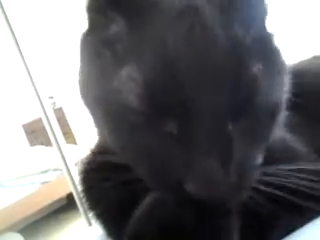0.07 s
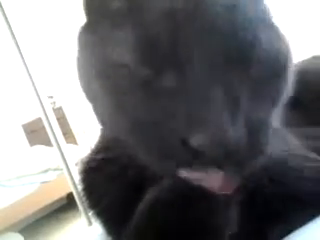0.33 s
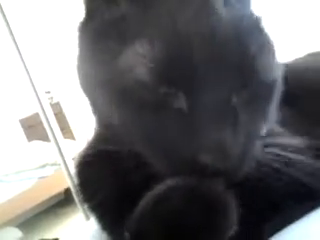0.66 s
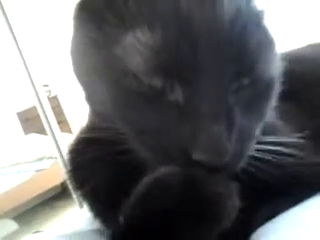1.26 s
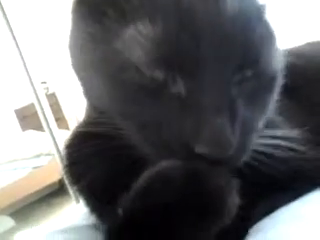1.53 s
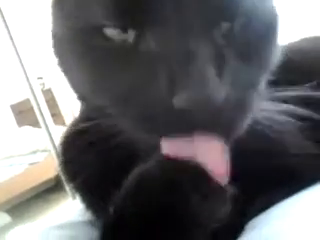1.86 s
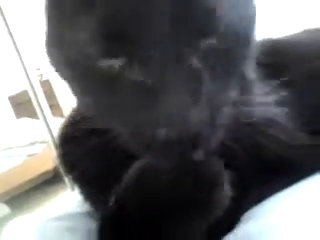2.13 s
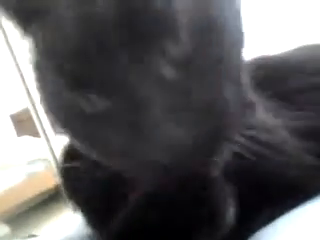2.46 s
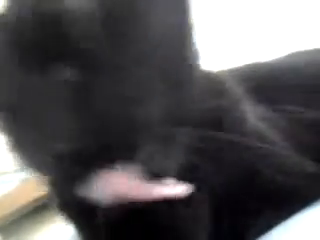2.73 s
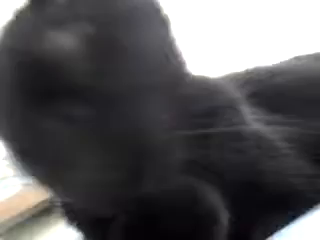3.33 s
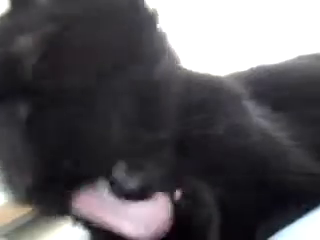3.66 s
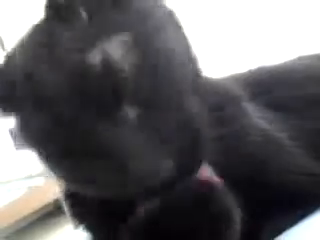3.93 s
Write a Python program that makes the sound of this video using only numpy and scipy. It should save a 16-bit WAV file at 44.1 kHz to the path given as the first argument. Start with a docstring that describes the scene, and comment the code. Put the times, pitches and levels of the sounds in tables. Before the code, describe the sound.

A cat licks its paw with faint wet ticks, and one sharp bump clicks midway.

```python
"""A cat licks its paw close to a small microphone, over room rumble, a faint wavering hum and hiss.
First the rough tongue brushes the fur twice. Then saliva films snap in wet ticks, and the parting
tongue and lips make soft, dull pops. Halfway through, amid the busiest licking, a bump gives one
sharp, rasping click with a low thud. The hum swells briefly, and the licking thins to a few ticks."""
import sys
import numpy as np
from scipy import signal
from scipy.fft import rfft, irfft, next_fast_len
from scipy.io import wavfile
from scipy.ndimage import map_coordinates

SR = 44100
rng = np.random.default_rng(int(sys.argv[2]) if len(sys.argv) > 2 else 0)


def generate_wav(sig):
    """Save sig (samples, or channels by samples) to the path in sys.argv[1] as 16-bit PCM at SR."""
    pcm = np.round(np.clip(np.atleast_2d(sig).T, -1, 1) * 32767).astype(np.int16)
    wavfile.write(sys.argv[1], SR, pcm)


N = 176400


def amp(db):
    """Decibels to gain."""
    return 10 ** (np.asarray(db) / 20)


def unit(x):
    """Scale to rms 1."""
    return x / np.sqrt(np.mean(x ** 2) + 1e-20)


def add(track, s, sound):
    """Mix a sound in at s seconds."""
    i = int(round(s * SR))
    track[i:i + len(sound)] += sound[:N - i]


def curves(rows):
    """Automation lanes: one value per sample for each column after the time."""
    times, *columns = np.transpose(rows)
    return [np.interp(np.arange(N) / SR, times, column) for column in columns]


def wobble(rate):
    """A smooth random curve, rate knots a second."""
    return map_coordinates(rng.standard_normal(400), [np.arange(N) * rate / SR], mode="mirror")


def coloured(x, points):
    """EQ x through (frequency [Hz], gain [dB]) points on a log frequency axis."""
    point_hz, db = np.transpose(points)
    hz = np.fft.rfftfreq(len(x), 1 / SR)
    gain = amp(np.interp(np.log(hz + 1), np.log(point_hz + 1), db))
    return irfft(rfft(x) * gain, len(x))


def noise(points):
    """Coloured noise of rms 1."""
    return unit(coloured(rng.standard_normal(N), points))


def decay(t, t60):
    """Falls 60 dB in t60 seconds."""
    return np.exp(-np.log(1000) * t / t60)


# Cues for the snapping saliva films:
# (time [s], ring level [dB], pitch [Hz], ring decay t60 [s], snap level [dB])
TICKS = [(.154, -59, 2750, .012, -64), (0.3988, -48, 2480, 0.009, -49.5), (0.5436, -55, 2600, .01, -60),
         (0.565, -48, 2750, .009, -46.5), (.5658, -50, 3600, .008, -57), (.6727, -54, 3300, .006, -47.5),
         (.936, -54, 3450, .01, -57), (1.483, -55, 1890, .01, -60), (1.9505, -41.5, 1700, 0.0053, -48),
         (1.9558, -45, 1550, .008, -54), (2.008, -48.5, 2600, 0.016, -46.5),
         (2.0728, -61, 2700, 0.009, -54), (2.0858, -43.5, 3070, 0.0064, -41),
         (2.086, -44.5, 4400, 0.0067, -55), (2.148, -54, 2680, .008, -61), (2.376, -56, 3260, .012, -49),
         (2.4951, -46, 2550, 0.01, -49), (2.497, -55, 4230, .008, -49), (3.069, -39.5, 2645, .0115, -55),
         (3.338, -46.5, 2790, 0.012, -54), (3.512, -54, 2600, .01, -62), (3.647, -54.5, 2900, .014, -62),
         (3.834, -56, 3450, 0.0091, -59), (3.980, -51.5, 2450, 0.012, -58)]


def tongue_ticks(attack_s=0.00037, snap_t60_s=0.0062, snap_band_hz=(1300, 4870)):
    """Each wet snap crackles and rings a tiny pocket of air for a few milliseconds."""
    out, t = np.zeros(N), np.arange(SR // 20) / SR
    band = signal.butter(3, snap_band_hz, "band", fs=SR, output="sos")
    attack = 1 - np.exp(-t / attack_s)
    for s, ring_db, hz, t60, snap_db in TICKS:
        ring = np.sqrt(2) * np.sin(2 * np.pi * hz * t) * decay(t, t60) * attack
        snap = signal.sosfilt(band, rng.standard_normal(len(t)) * decay(t, snap_t60_s))
        add(out, s, amp(ring_db) * ring + amp(snap_db) * snap / abs(snap).max())
    return out


# Cues for tongue and lips parting:
# (time [s], peak before the cavity resonance [dB], start pitch [Hz], end pitch [Hz], attack [s])
POPS = [(.5651, -42, 1750, 550, .001), (0.6727, -45, 1150, 620, 0.0011), (0.6942, -40.5, 806, 160, .0011),
        (1.0244, -42.5, 866, 200, 0.0012), (1.4996, -39, 920, 190, 0.0013),
        (1.5687, -53, 850, 220, 0.00089), (1.6981, -39, 810, 190, 0.0016),
        (1.9552, -34.5, 890, 190, 0.0013), (2.0068, -49, 2100, 520, .0009),
        (2.071, -42.5, 1230, 170, 0.0017), (2.0858, -42.5, 600, 150, 0.0019),
        (2.1301, -47, 835, 220, 0.0016), (2.1477, -47.5, 1600, 430, .0011),
        (2.1921, -45.5, 990, 149, .0019), (2.274, -52, 755, 200, .0012), (2.4949, -39, 330, 161, 0.0021),
        (2.4982, -45.5, 1000, 350, 0.00077), (3.3372, -50, 1900, 1200, .0008)]


def mouth_pops(glide_s=0.0015, cavity_hz=690, cavity_db=-6):
    """A release of suction rings the mouth for a few cycles; the pitch dives as the gap opens."""
    pops, t = np.zeros(N), np.arange(SR // 20) / SR
    for s, db, start_hz, end_hz, attack_s in POPS:
        hz = end_hz + (start_hz - end_hz) * np.exp(-t / glide_s)
        swell = t / attack_s * np.exp(1 - t / attack_s)
        add(pops, s, amp(db) * swell * np.sin(2 * np.pi * np.cumsum(hz) / SR))
    cavity = signal.lfilter(*signal.iirpeak(cavity_hz, Q=3.5, fs=SR), pops)  # firms up every pop
    return pops + amp(cavity_db) * cavity


# Cues for the tongue dragging over fur: (centre time [s], length [s], level [dB])
STROKES = [(0.133, .04, -76), (0.319, 0.04, -65)]
# EQ of the fur's brushy midrange: (frequency [Hz], gain [dB])
FUR_EQ = [(500, -24), (1500, -1), (2600, 0), (4000, -10), (8000, -22)]


def fur_strokes(barbs_per_s=1500):
    """The tongue's barbs rasp faintly over the fur, swelling and fading."""
    t = np.arange(N) / SR
    swell = sum(amp(db) * np.exp(-(2 * (t - s) / length) ** 2) for s, length, db in STROKES)
    barbs = rng.standard_normal(N) * (rng.random(N) < barbs_per_s / SR)
    return swell * unit(coloured(barbs, FUR_EQ))


# EQ of the skid's gritty rasp: (frequency [Hz], gain [dB])
RASP_EQ = [(200, 1.5), (380, 4), (720, 3), (1100, -3), (1900, 1), (2700, -15), (3900, 1), (6000, -3),
           (8200, -4.5), (10500, -11.5), (13500, -19), (15500, -26)]
# Ringing modes of the bumped object: (frequency [Hz], relative level [dB])
BODY_MODES = [(229, 1), (470, -6), (675, 3), (924, -7), (1410, -7), (1675, -5.5), (1876, -5), (4190, -4),
              (4541, -4), (4690, -8), (5190, -9), (5728, -7), (7743, -11)]


def bump(skid_s=1.975, rise_s=0.0045, contacts_per_s=7000, layer_db=-39,
         thud_s=1.9782, thud_hz=102, thud_db=-33.5):
    """A skid of tiny contacts rasps and rings an object, damped as it comes to rest, over a thud."""
    out, t = np.zeros(N), np.arange(SR // 5) / SR
    contacts = (rng.random(len(t)) < contacts_per_s / SR) * np.sign(rng.standard_normal(len(t)))
    rasp = coloured(contacts, RASP_EQ)
    ring = sum(amp(db) * np.sin(2 * np.pi * (hz * t + rng.random())) for hz, db in BODY_MODES)
    attack = np.minimum(t / rise_s, 1) ** 2
    for source, hold_s, t60 in (rasp, 0.008, 0.025), (ring, 0.011, 0.026):
        layer = source * attack * decay(np.maximum(t - rise_s - hold_s, 0), t60)
        burst_rms = np.sqrt(np.sum(layer ** 2) / (0.008 * SR))  # as if packed into 8 ms
        add(out, skid_s, amp(layer_db) * layer / burst_rms)
    add(out, thud_s, amp(thud_db) * np.sin(2 * np.pi * thud_hz * t) * decay(t, t60=0.05))
    return out


def room_reverb(x, t60=0.08):
    """The short, dead tail of a soft, furnished room."""
    t = np.arange(SR // 4) / SR
    tail = rng.standard_normal(len(t)) * decay(t, t60)
    return signal.fftconvolve(x, tail / np.linalg.norm(tail))[:N]


# Fader rides of the rumble: (time [s], deep bass level [dB], upper bass level before trim [dB])
RUMBLE_LEVELS = [(0, -57, -57.5), (.4, -57.5, -57), (.54, -55, -55), (.62, -50.5, -50.5), (.76, -50, -55.5),
                 (.87, -48.5, -56.5), (.98, -58.5, -55.5), (1.47, -52.5, -55), (1.85, -58, -56.5),
                 (2.1, -53.5, -56), (2.55, -57, -56.5), (2.75, -56.5, -59), (3.05, -56, -55.5),
                 (3.3, -58, -56.5), (3.5, -54.5, -57), (4, -56, -57)]
# EQ of the deep bass: (frequency [Hz], gain [dB])
DEEP_BASS_EQ = [(15, -9.5), (30, -6.5), (42, -7.5), (52, 1), (68, -11), (90, -23), (160, -53)]
# EQ of the upper bass: (frequency [Hz], gain [dB])
UPPER_BASS_EQ = [(50, -31), (75, -6), (92, 1), (130, 1), (175, -4), (205, -6.5), (232, -3.5), (275, -11.5),
                 (400, -36.5)]


def room_rumble(upper_trim_db=0.5):
    """A bed of two bass noise bands, each swelling and sinking slowly."""
    deep_db, upper_db = curves(RUMBLE_LEVELS)
    return amp(deep_db) * noise(DEEP_BASS_EQ) + amp(upper_db + upper_trim_db) * noise(UPPER_BASS_EQ)


# Fader ride of the hum: (time [s], level [dB])
HUM_LEVELS = [(0, -66.5), (.55, -66), (1.0, -66.5), (2.1, -64), (2.2, -56.5), (2.56, -57.5), (2.7, -64.5),
              (4, -71)]


def hum(pitch_hz=152.2, drift_hz=1.92):
    """One faint low tone whose pitch wavers at random."""
    db, = curves(HUM_LEVELS)
    hz = pitch_hz + drift_hz * wobble(rate=12)
    return amp(db) * unit(np.sin(2 * np.pi * np.cumsum(hz) / SR))


# EQ of the room air and microphone hiss: (frequency [Hz], gain [dB])
AIR_EQ = [(100, -2.5), (290, 0), (400, -0.5), (520, -4.5), (700, -3), (900, -2), (1200, -5.5), (1600, -12),
          (2100, -12.5), (2700, -11), (3400, -14.5), (4500, -14), (6300, -13.5), (7800, -18),
          (11000, -19.5), (15500, -21)]


def air_and_hiss(level_db=-60, waver_db=0.2):
    """Room air and the microphone's own hiss make an almost steady noise floor."""
    return amp(level_db + waver_db * wobble(rate=4.15)) * noise(AIR_EQ)


def scene(reverb_db=-16):
    """The cat and the bump, close up, over the room tone, in mono."""
    near = tongue_ticks() + mouth_pops() + fur_strokes() + bump()
    reverb = amp(reverb_db) * room_reverb(near)
    return (near + reverb + room_rumble() + hum() + air_and_hiss())[None]


def record(dry, top_hz=15850):
    """A brick-wall low-pass takes off the very top of the treble."""
    padded = next_fast_len(N + SR // 2)
    passband = np.fft.rfftfreq(padded, 1 / SR) < top_hz
    return irfft(rfft(dry, padded) * passband, padded)[..., :N]


dry = scene()
out = record(dry)
generate_wav(out)
```